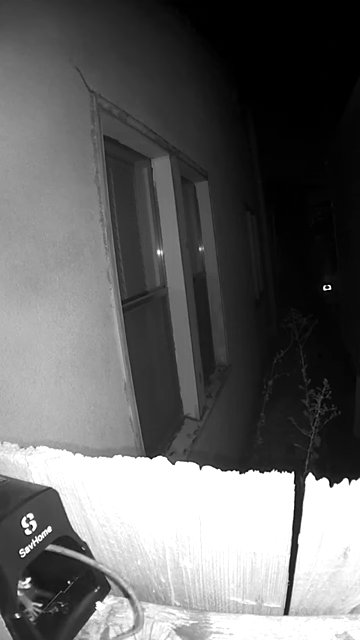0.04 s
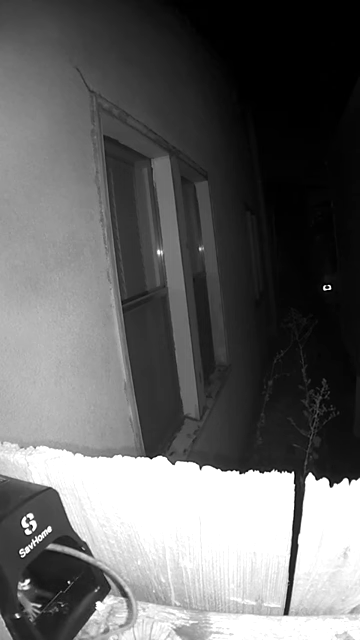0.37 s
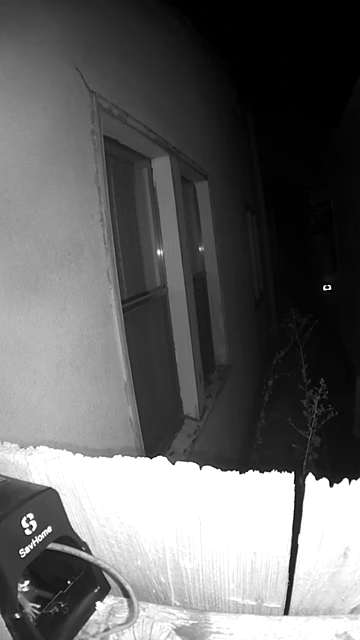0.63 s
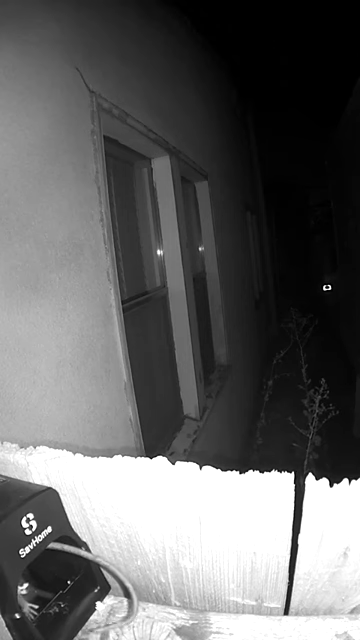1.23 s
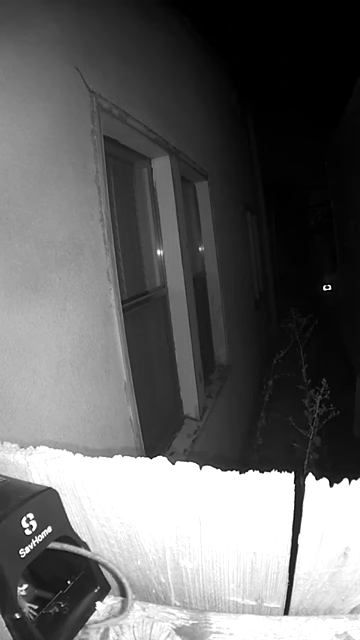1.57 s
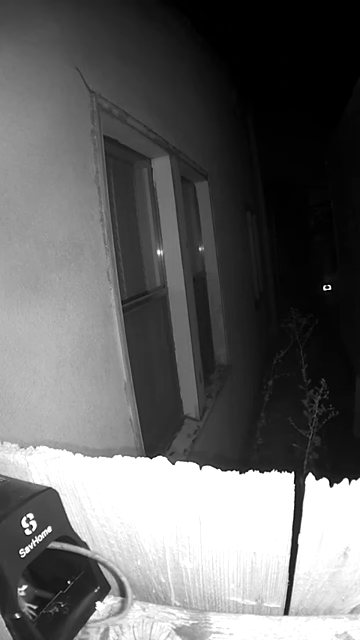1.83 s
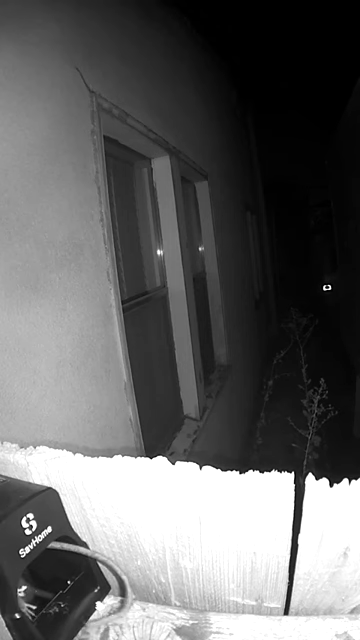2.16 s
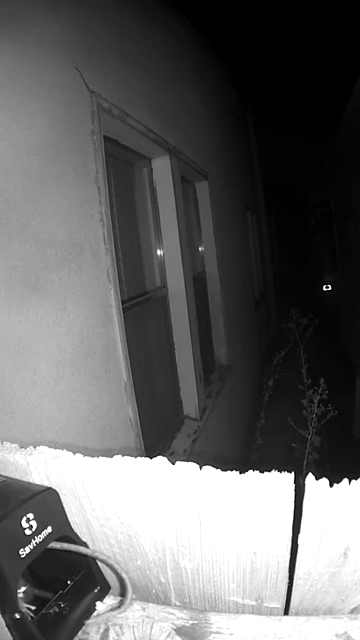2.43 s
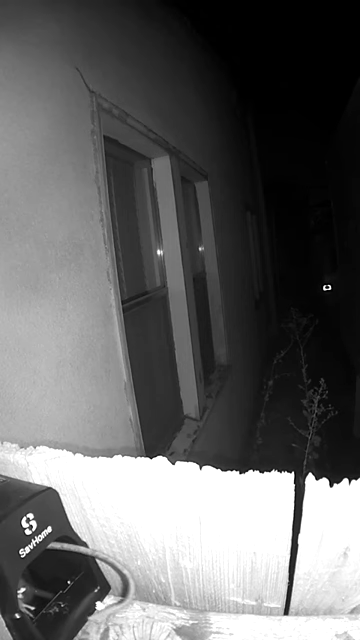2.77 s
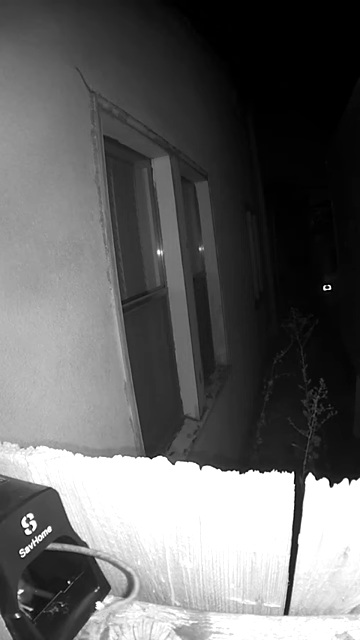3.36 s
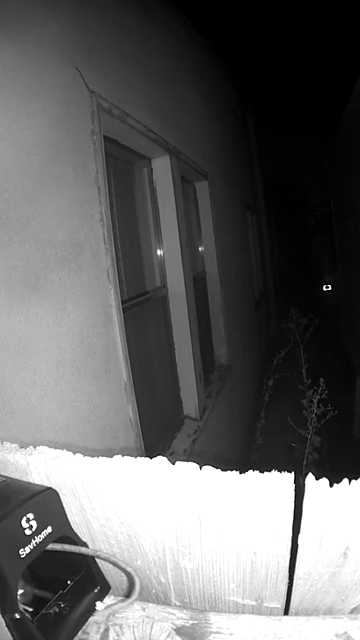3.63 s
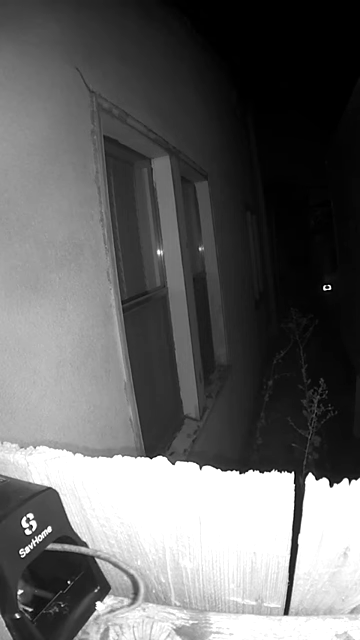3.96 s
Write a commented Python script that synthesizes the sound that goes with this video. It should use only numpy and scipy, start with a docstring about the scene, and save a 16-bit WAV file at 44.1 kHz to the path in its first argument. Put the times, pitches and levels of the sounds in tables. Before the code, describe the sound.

A harsh electric buzz from an insect trap runs, sputters and stops.

```python
"""An electric trap outdoors at night, its high-voltage supply ticking about 205 times a second.
A faint whine and a thin buzz come first. Just before 0.2 s something bridges the contacts, and each
pulse sparks: a harsh buzz that weakens, sputters and lets go near 3 s. The idle whine remains, and
a small animal chirps four times far away. Night air and the hum of distant machinery lie beneath it all."""
import sys
import numpy as np
from scipy import signal
from scipy.fft import rfft, irfft
from scipy.io import wavfile
from scipy.ndimage import uniform_filter1d

SR = 44100
rng = np.random.default_rng(int(sys.argv[2]) if len(sys.argv) > 2 else 0)


def store_pcm(level_fs):
    """Save levels as 16-bit WAV."""
    pcm = np.round(np.clip(level_fs, -1, 1) * 32767).astype(np.int16)
    wavfile.write(sys.argv[1], SR, np.atleast_2d(pcm).T)


N = 176400
T = np.arange(N) / SR
HZ = np.fft.rfftfreq(N, 1 / SR)
PULSE_HZ = 204.69

# Spectrum of the discharge. Each row: harmonic number, relative level in dB.
SPARK_SPECTRUM = [(1, -33.5), (2, -33.5), (3, -28), (4, -11), (5, -13.5), (6, -33.5), (7, -15.5),
                  (8, -23.5), (9, -17), (10, -18.5), (11, -23), (12, -12), (13, -17), (14, -14), (15, -8),
                  (16, -17.5), (17, -2.5), (18, -6), (19, -6), (20, -8.5), (21, -11.5), (22, -13.5),
                  (23, -14), (24, -16), (25, -3), (26, -6.5), (27, -2), (28, -7), (29, -3.5), (30, -6),
                  (31, -5), (32, -2), (33, -10.5), (34, -0.5), (35, -1), (36, -4.5), (37, 0.5), (38, -5),
                  (39, -3), (40, -12), (41, -15.5), (42, -32)]


def discharge(turns):
    """Spark discharge: each pulse across the contact ticks and fizzes. Returns buzz and contact state."""
    # Contact closures. Each row: start in seconds, end in seconds, extra level in dB.
    contacts = [(.174, 2.66, 0), (2.665, 2.67, 0), (2.675, 2.852, 0), (2.875, 2.879, -3),
                (2.879, 2.889, 2.5), (2.894, 2.909, -.5), (2.925, 2.934, -3), (2.934, 2.964, 3)]
    # Spark strength. Each row: time in seconds, base levels of the treble and of the middle in dB.
    load = [(.18,-52,-62.5), (.23,-49.5,-58), (.3,-45.5,-51.5), (.42,-44,-50.5), (.72,-45,-52),
            (.82,-44.2,-52), (.96,-45,-53), (1.0,-48.5,-54), (1.05,-47,-53), (1.3,-48,-55),
            (1.55,-49.5,-56), (1.7,-50,-57), (1.76,-49.5,-54.5), (1.82,-50.5,-57), (2.01,-49.5,-55.5),
            (2.11,-51.5,-55), (2.15,-48,-56), (2.28,-49.6,-56.5), (2.45,-49.5,-55), (2.62,-49.5,-55.5),
            (2.66,-49.5,-58.5), (2.73,-49.5,-57.5), (2.85,-50.5,-58), (2.88,-51.5,-63)]
    # Unsteadiness. Each row: time in seconds, pulse-to-pulse spread in dB, fizz relative to tone in dB.
    sparking = [(.18, 0.4, -18), (.35, 0.18, -27), (.9, 0.44, -24.5), (1.6, .6, -20.5), (2.2, 0.5, -19),
                (2.4, 1, -14), (2.8, 0.5, -17), (2.96, 1, -21)]
    # Flares and sags. Each row: start in seconds, end in seconds, level change in dB, extra fizz in dB.
    sputters = [(1.02, 1.04, 1, 8), (1.045, 1.1, 0.5, 5), (1.585, 1.645, -1, 4), (1.648, 1.66, 1, 4),
                (2.303, 2.34, -2, 3), (2.342, 2.356, 0.5, 4), (2.355, 2.408, -2.5, 6), (2.41, 2.458, 0, 2)]
    hz, waves = ticks(SPARK_SPECTRUM, turns)
    pulse = np.floor(turns + .1).astype(int)
    fired_s = (pulse - turns[0]) / PULSE_HZ  # contact and sputters switch on whole pulses
    closed = np.max([amp(db) * ((fired_s > a) & (fired_s < b)) for a, b, db in contacts], axis=0)
    uneven_db = rng.standard_normal(N)[pulse] * curve(sparking, T)
    steps = sum(np.outer([db, extra], (fired_s > a) & (fired_s < b)) for a, b, db, extra in sputters)
    flare_db, rasp_db = uniform_filter1d(steps, size=64)
    fizz_gain = amp(curve(sparking, T, column=2) + rasp_db)
    treble_db, middle_db = curve(load, T), curve(load, T, column=2)
    load_db = middle_db + 52  # relative to full load
    # Four registers, bass to treble; the lower two swell faster than the middle.
    register = np.digitize(hz, [1300, 2600, 4800])
    levels_db = [-63.5 + 1.63 * load_db, -63 + 1.43 * load_db, middle_db - .5, treble_db - .16]
    buzz = np.zeros(N)
    for index, db in enumerate(levels_db):
        band = register == index
        tone = unit(waves[band].sum(0))
        hiss = noise(amp(curve(SPARK_SPECTRUM, HZ / PULSE_HZ)) * np.interp(HZ, hz, band))
        fizz = hiss * unit(abs(signal.hilbert(tone)))  # the noise follows each tick's envelope
        buzz += amp(db + flare_db + .46 * drift(hz=22)) * (tone + fizz_gain * fizz)
    return buzz * uniform_filter1d(closed * amp(uneven_db), size=16), np.minimum(closed, 1)


def ticks(spectrum, turns):
    """Dispersion: the casing delays a tick's harmonics unequally. Returns their pitches and waves."""
    # Group delay of the casing. Each row: frequency in Hz, delay in milliseconds.
    group_delay = [(800, .1), (3600, 0.21), (4500, .3), (5200, 0.12), (5800, 1.45), (6400, 1.08),
                   (7000, .5), (8000, .2)]
    k = np.arange(1, len(SPARK_SPECTRUM) + 1)
    gain = amp(curve(spectrum, np.arange(len(k) + 2)))
    log_gain = np.log(gain)
    minimum_phase = -signal.hilbert(np.r_[log_gain, log_gain[-2:0:-1]]).imag[k]
    lag_turns = np.cumsum(curve(group_delay, k * PULSE_HZ)) * PULSE_HZ / 1000
    phase = 2 * np.pi * (k[:, None] * turns - lag_turns[:, None]) + minimum_phase[:, None]
    return k * PULSE_HZ, gain[k, None] * np.cos(phase)


def idle_whine(turns):
    """Periodic excitation: the unloaded supply's ticks sound as faint harmonics of the pulse rate."""
    # Spectrum of the whine. Each row: harmonic number, relative level in dB.
    spectrum = [(1, -13), (4, -9.5), (9, -18.5), (14, -13.5), (16, -13), (17, -3.5), (19, -16), (21, -11),
                (23, -20.5), (25, -2.5), (27, -7), (28, -6.5), (29, -5), (30, -3.5), (31, -1), (32, -2.5),
                (33, -11.5), (34, -1.5), (36, -1.5), (37, -0.5), (38, -5.5), (39, -4), (42, -30)]
    # Course of the whine. Each row: time in seconds, level in dB.
    levels = [(0, -90), (.06, -86), (.09, -72.5), (.2, -68.5), (3.0, -63), (3.6, -67), (4, -63.5)]
    _, waves = ticks(spectrum, turns)
    return unit(waves.sum(0)) * amp(curve(levels, T) + .32 * drift(hz=60))


def thin_buzz(turns, start_s=.071, end_s=.2, fade_s=.025, level_db=-66.5):
    """A harmonic series on the pulse rate swells briefly as the contact nears."""
    # Spectrum just before the spark strikes. Each row: harmonic number, relative level in dB.
    spectrum = [(3, -24), (5, -2), (9, -13), (12, -1), (15, -12), (17, 4), (19, -13), (21, 4), (23, -16),
                (27, -15), (32, -10), (40, -12)]
    _, waves = ticks(spectrum, turns)
    nearing = np.clip(np.minimum(T - start_s, end_s - T) / fade_s, 0, 1)
    return amp(level_db) * nearing * unit(waves.sum(0))


def animal_chirps(length_s=.016, fall_hz_per_s=45000):
    """Frequency modulation: each call of a small, distant animal is a short downward sweep."""
    # Calls. Each row: start in seconds, starting frequency in Hz, peak level in dB.
    calls = [(3.19, 6300, -72), (3.445, 6800, -64), (3.685, 6100, -69), (3.947, 6100, -63)]
    out = np.zeros(N)
    for start, hz, db in calls:
        t = np.clip(T - start, 0, length_s)
        envelope = amp(db) * np.sin(np.pi * t / length_s) ** 2
        out += envelope * np.sin(2 * np.pi * (hz - fall_hz_per_s * t / 2) * t)
    return out


def machinery():
    """Superposition: far machines add several humming tones and a low drone that comes and goes."""
    # Hum. Each row: frequency in Hz, level in dB, rms pitch wander in Hz.
    tones = [(59.3, -61, .7), (118.1, -72, 2), (176.7, -76, 1.5), (333, -79.5, 2), (628.7, -82, 1),
             (694.6, -79.5, 1.1), (1302, -84.5, 1)]
    # Course of the drone. Each row: time in seconds, level in dB.
    drone_levels = [(0, -72), (.15, -60.5), (.5, -60.5), (.9, -73), (1.1, -75), (1.7, -64.5), (2.5, -59.5),
                    (2.7, -65.5), (4, -65.5)]
    hum = sum(hum_tone(*row) for row in tones)
    return hum + hum_tone(hz=89.7, db=curve(drone_levels, T), wander_hz=.95)


def hum_tone(hz, db, wander_hz, throb_db=1.5):
    """Random modulation of amplitude and frequency makes a machine's tone throb and waver."""
    gain = amp(db + throb_db * drift(hz=4))
    pitch_hz = hz + wander_hz * drift(hz=5)
    return gain * unit(np.cos(2 * np.pi * np.cumsum(pitch_hz) / SR))


def night_air(level_db=-57, top_hz=8000):
    """Broadband noise: the open air rumbles and hisses, fluctuating in patches of time and frequency."""
    # Spectrum of the air. Each row: frequency in Hz, relative spectral density in dB.
    spectrum = [(10, -2.5), (25, -1.5), (45, -1.5), (70, -4), (110, -4.5), (170, -5), (250, -9.5),
                (335, -7.5), (400, -15), (480, -14.5), (600, -19.5), (800, -19), (1200, -22.5),
                (1600, -24.5), (2500, -27), (4500, -29), (6000, -28.5), (7200, -27.5), (8000, -32)]
    hz, db = np.transpose(spectrum)
    colour = amp(np.interp(np.log(HZ + 1), np.log(hz), db)) * (HZ < top_hz)
    frames = signal.stft(noise(colour), nperseg=1024, noverlap=768)[2]
    patches = uniform_filter1d(rng.standard_normal(frames.shape), size=10, axis=0)
    patch_db = unit(uniform_filter1d(patches, size=20, axis=1))
    air = signal.istft(frames * amp(patch_db), nperseg=1024, noverlap=768)[1][:N]
    return amp(level_db) * unit(air)


def noise(gain):
    """Spectral shaping: white noise weighted by a gain at each frequency, at unit rms."""
    return unit(irfft(rfft(rng.standard_normal(N)) * gain, N))


def drift(hz):
    """Low-pass noise: random motion up to about the given rate."""
    return noise(np.exp(-(HZ / hz) ** 2))


def curve(rows, at, column=1):
    """Linear interpolation of one column of a table against the first."""
    rows = np.array(rows, float)
    return np.interp(at, rows[:, 0], rows[:, column])


def amp(db):
    """Decibels to amplitude ratio."""
    return 10 ** (np.asarray(db) / 20)


def unit(x):
    """Normalisation to an rms of one."""
    return x / np.sqrt(np.mean(x ** 2) + 1e-20)


def scene():
    """Superposition of trap and night; the whine gives way to the buzz while the contact is closed."""
    turns = PULSE_HZ * T + .17  # phase of the supply in cycles
    buzz, closed = discharge(turns)
    idle = 1 - uniform_filter1d(closed, size=16)
    trap = thin_buzz(turns) + buzz + idle * idle_whine(turns)
    return (trap + night_air() + machinery() + animal_chirps())[None]


def record(dry):
    """Spectral imaging: a low sample rate mirrors the top treble; two low-pass filters limit the band."""
    rate_hz, edge_hz = 16000, 9200
    mirrored = dry * (1 + 2 * np.cos(2 * np.pi * rate_hz * T))
    gentle = signal.firwin(91, rate_hz / 2, window=("kaiser", 9), fs=SR)
    steep = signal.firwin(511, edge_hz, window=("kaiser", 9), fs=SR)
    return signal.oaconvolve(mirrored, np.convolve(gentle, steep)[None], "same")


dry = scene()
out = record(dry)
store_pcm(out)
```